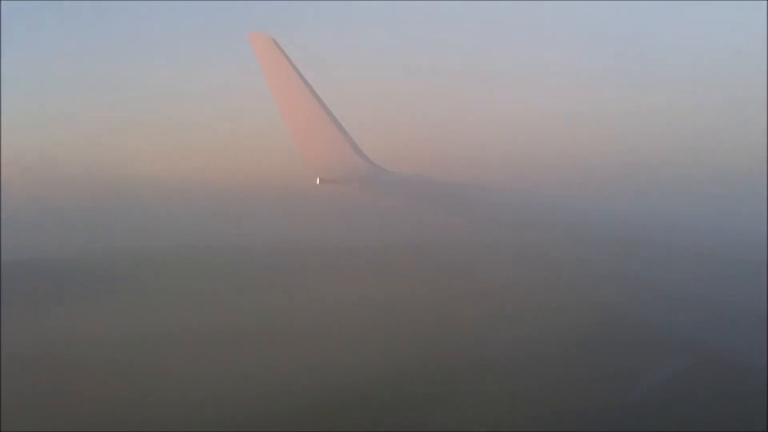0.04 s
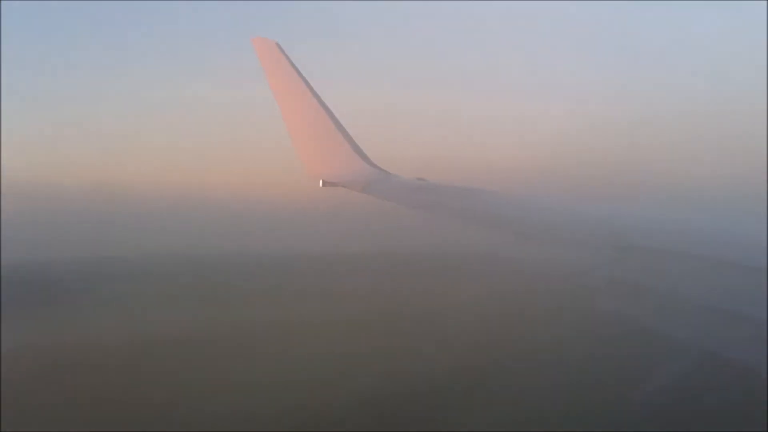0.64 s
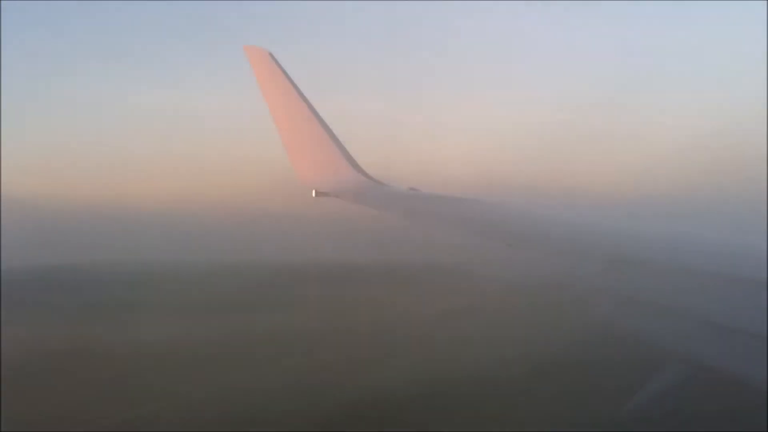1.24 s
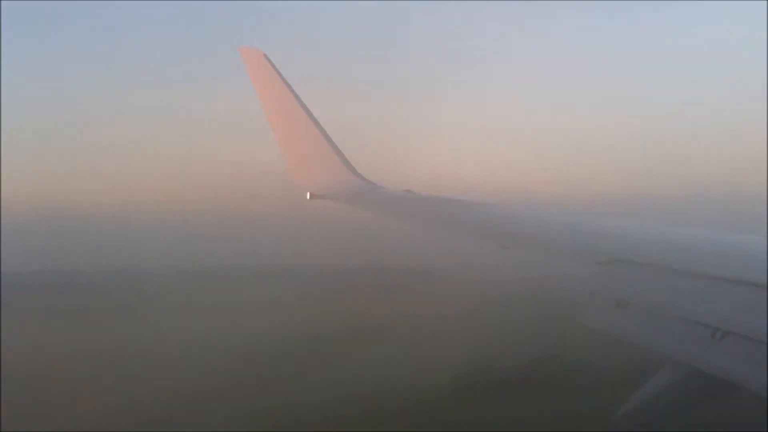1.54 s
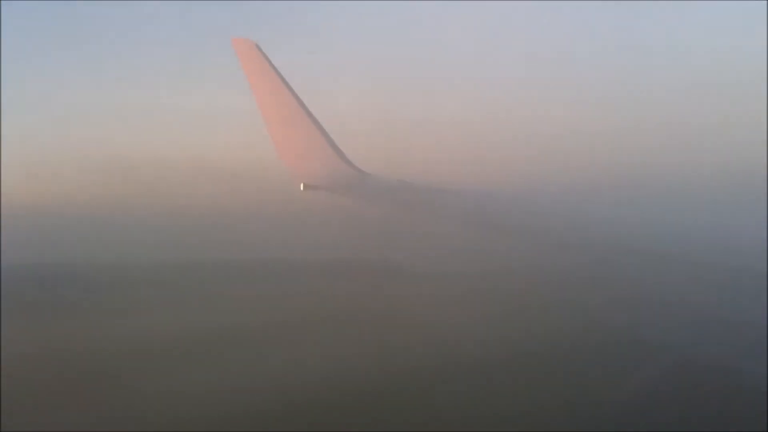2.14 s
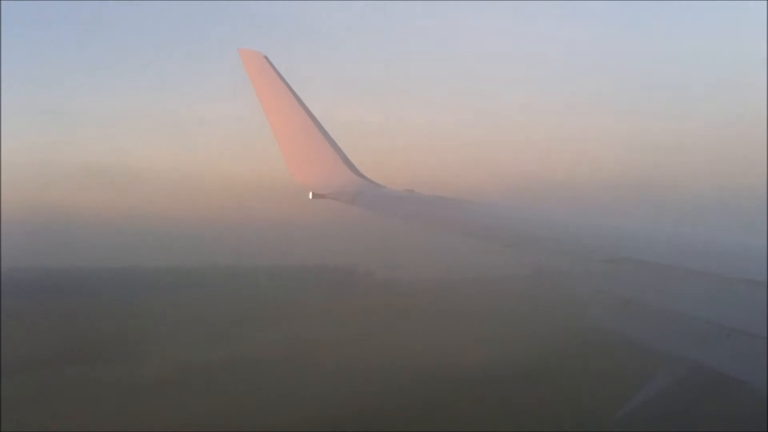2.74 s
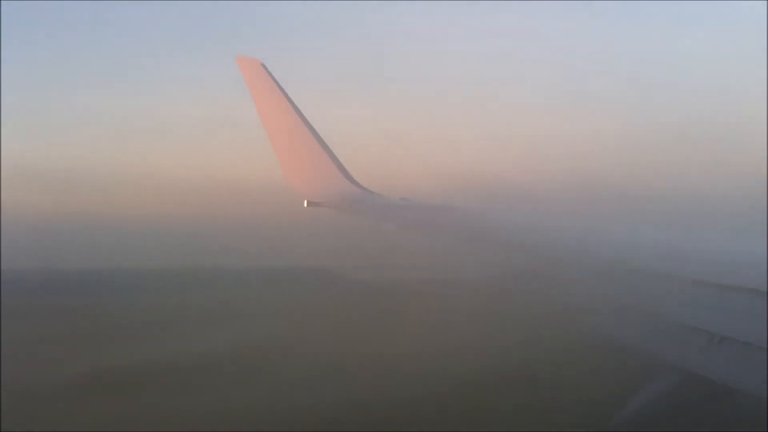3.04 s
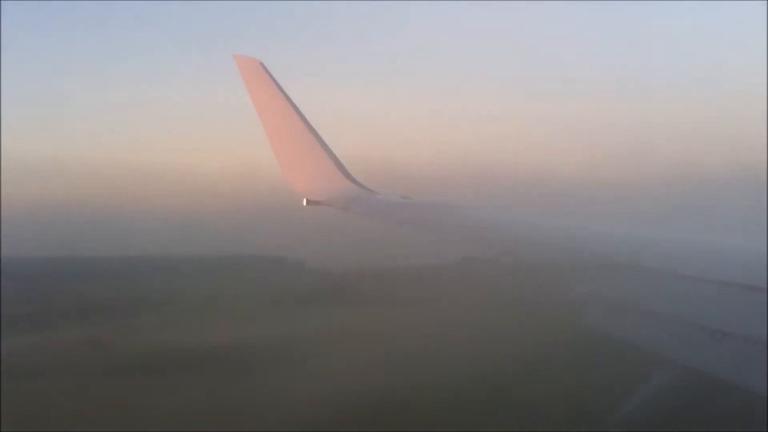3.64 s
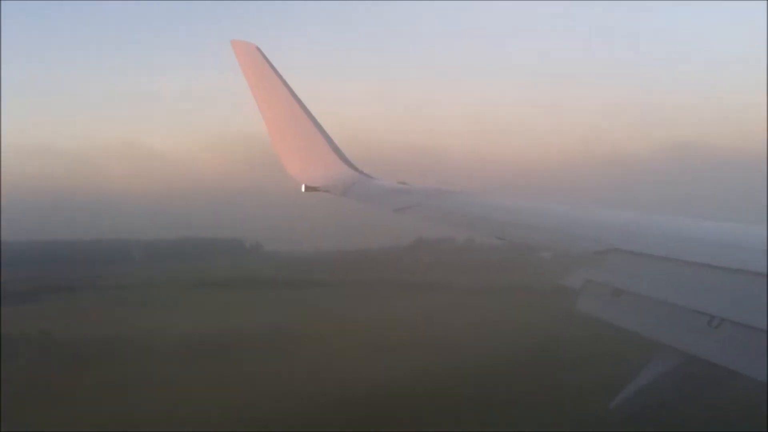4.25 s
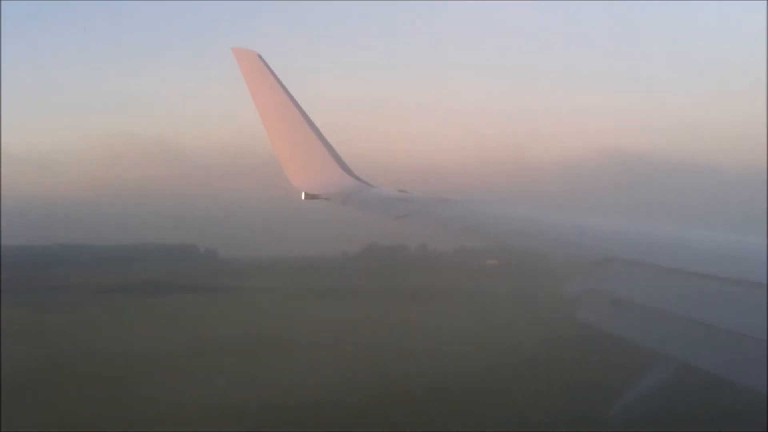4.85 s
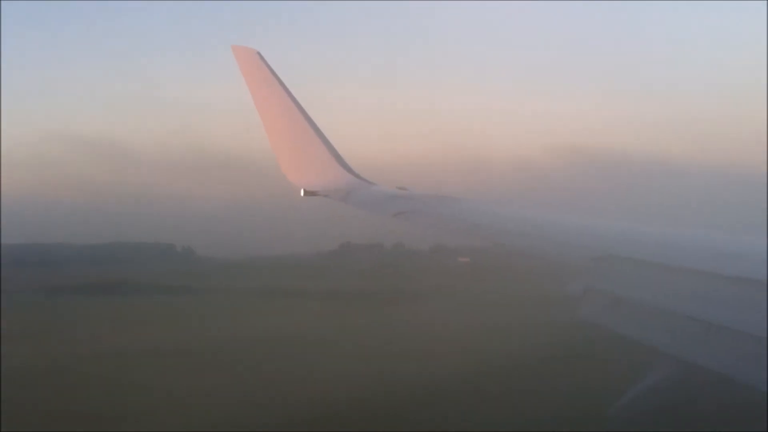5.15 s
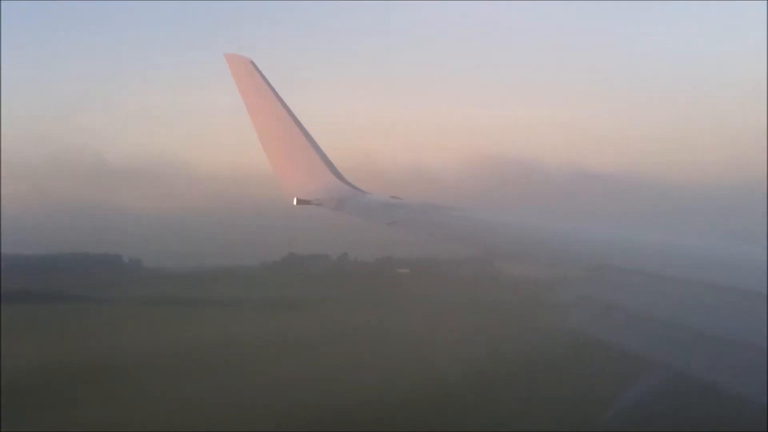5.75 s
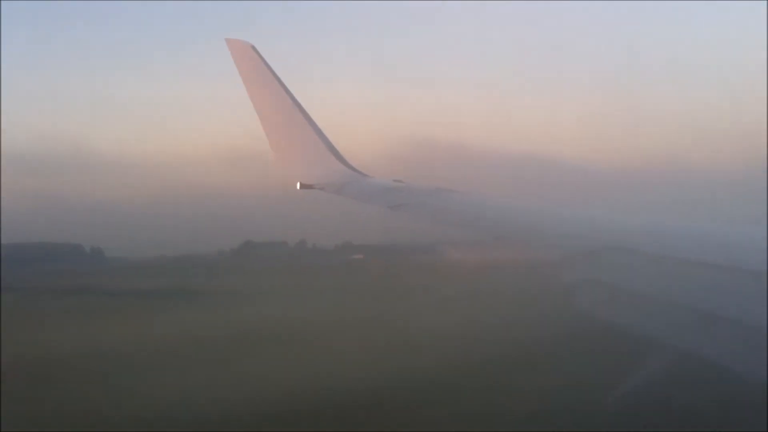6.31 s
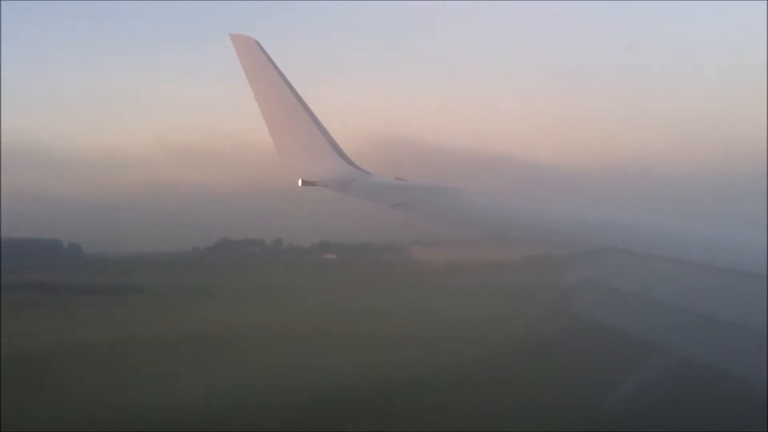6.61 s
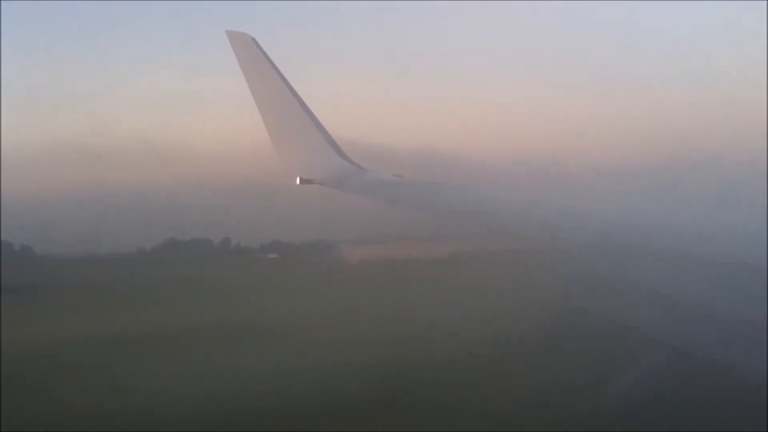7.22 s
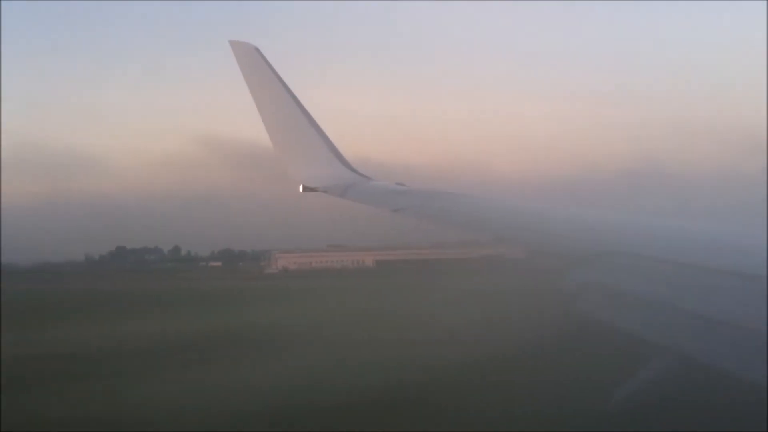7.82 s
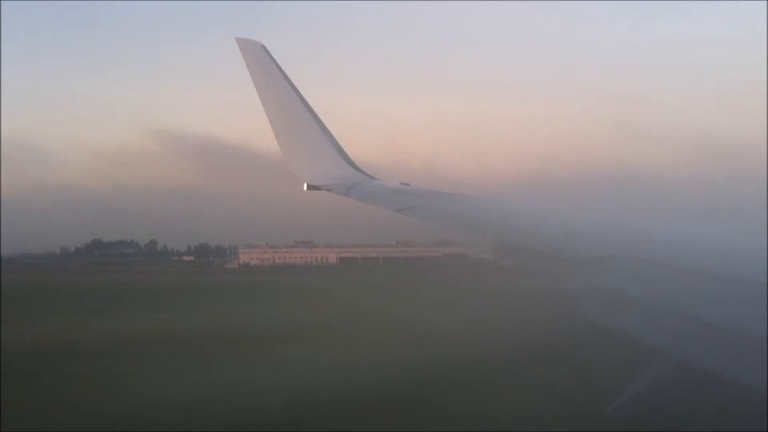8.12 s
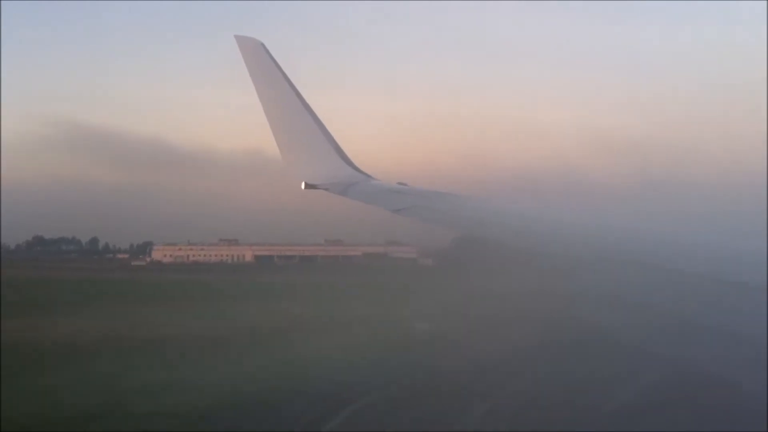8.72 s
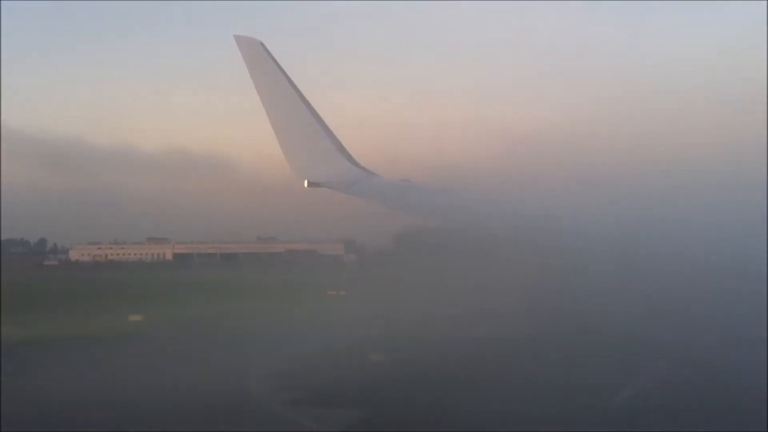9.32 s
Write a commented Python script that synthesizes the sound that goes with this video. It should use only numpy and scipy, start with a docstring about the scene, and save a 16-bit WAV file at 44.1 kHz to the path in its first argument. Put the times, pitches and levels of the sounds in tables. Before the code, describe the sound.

A low, steady roar of jet engines fills an aircraft cabin, heard from a seat by the window. It wavers slightly and slowly grows a little quieter, with a faint airflow hiss above it the whole time. A few soft, dull knocks from a wall panel come through the rumble, two close together and then one more later.

```python
"""A window seat inside an airliner flying low over an airfield.
Engine exhaust and turbulent airflow force the fuselage into vibration. The lined walls transmit mainly
low frequencies, and cabin resonances colour them into a deep roar that heaves and slowly eases.
A wall panel shifts and rings in a few soft knocks. The slipstream adds a faint rush, and on top
lies a thin hiss; the treble of both dips briefly at irregular moments."""
import sys
import numpy as np
from scipy import signal
from scipy.fft import rfft, irfft
from scipy.io import wavfile
from scipy.ndimage import uniform_filter1d

SR = 44100
rng = np.random.default_rng(int(sys.argv[2]) if len(sys.argv) > 2 else 0)


def output_pcm(signal):
    """Save a mono or channel-first signal as 16-bit PCM at the path in sys.argv[1].

    Samples are clipped to [-1, 1] before scaling.
    """
    pcm = np.clip(np.atleast_2d(signal).T, -1, 1) * 32767
    wavfile.write(sys.argv[1], SR, np.round(pcm).astype(np.int16))


N = 417627

# Turbulence heard through the walls. Each row: frequency in Hz, relative spectral level in dB.
ROAR_SPECTRUM = [(12, -49), (32, -43), (45, -21), (65, -15.5), (95, -7), (127, -7), (155, -2.5), (215, -5),
                 (270, -12), (335, -13.5), (400, -23.5), (520, -37.5), (900, -58), (2000, -87)]
# Resonances of the cabin air and walls. Each row: centre in Hz, width in Hz, lift in dB.
CABIN_RESONANCES = [(108.3, 15.5, 8), (177.8, 20.4, 3.5), (218, 4.8, 1.5), (239.6, 8, 3), (303.5, 37, 5),
                    (331.6, 14.4, 4)]
# The roar's slow heaving and easing. Each row: time in seconds, relative level in dB.
ROAR_ENVELOPE = [(0, -40.5), (.95, -42.5), (1.35, -41), (2.1, -42.6), (3.6, -41.5), (4.2, -43.5),
                 (4.65, -42), (5.05, -43.5), (7.3, -44), (8, -43), (8.5, -44.5), (9.47, -44)]
# Knocks of the wall panel. Each row: start in seconds, peak level in dB before the treble is removed.
PANEL_KNOCKS = [(1.851, -48), (2.3302, -41), (5.4604, -36.5)]
# Modes of the panel. Each row: frequency in Hz, relative level in dB, time to decay 60 dB in seconds.
PANEL_MODES = [(166, 5, 0.061), (322, 5, .025), (680, -17, .008), (890, -11, 0.012), (1380, -4, .008)]
# Air rushing along the skin. Each row: frequency in Hz, relative spectral level in dB.
AIRFLOW_SPECTRUM = [(200, -6.5), (450, 2), (620, -1), (710, -4), (815, -1), (900, -6.5), (1150, -9),
                    (1800, -15), (4000, -30)]
# The thin hiss. Each row: frequency in Hz, relative spectral level in dB.
HISS_SPECTRUM = [(300, -5), (1000, -1.5), (2000, -1), (4000, -2), (8500, -5), (10500, -6.5), (12500, -6),
                 (15500, -4)]


def roar(level_db=-42.5, crossover_hz=260, buffet_db=1.0, drone_share=0.59):
    """Forced vibration: exhaust and turbulence drive the cabin, which responds most at its resonances."""
    hz = np.fft.rfftfreq(N, 1 / SR)
    lift_db = sum(db / (1 + (2 * (hz - centre) / width) ** 2) for centre, width, db in CABIN_RESONANCES)
    boom, drone = split_bands(shaped_noise(ROAR_SPECTRUM, lift_db), crossover_hz)
    times, envelope_db = np.transpose(ROAR_ENVELOPE)
    heave_db = np.interp(np.arange(N) / SR, times, envelope_db - envelope_db.mean())
    swing_db = heave_db + buffet_db * buffeting()
    boom = steadied(boom, seconds=0.3) * amplitude(swing_db)
    drone = steadied(drone, seconds=0.49) * amplitude(drone_share * swing_db)  # the upper band swings less
    return amplitude(level_db) * unit_rms(boom + drone)


def buffeting(slow_hz=3.7, fast_hz=19):
    """Random amplitude modulation: a slow, band-limited fluctuation of rms 1 for the roar's level."""
    hz = np.fft.rfftfreq(N, 1 / SR)
    band = hz / (hz + slow_hz) / (1 + (hz / fast_hz) ** 4)
    return unit_rms(irfft(rfft(rng.standard_normal(N)) * band, N))


def panel_knocks(cutoff_hz=1570):
    """Damped free vibration: the panel shifts in its seat, and each of its modes decays exponentially."""
    t = np.arange(SR // 4) / SR
    ring = sum(amplitude(db - 60 * t / t60) * np.cos(2 * np.pi * hz * t) for hz, db, t60 in PANEL_MODES)
    ring /= abs(ring).max()
    knocks = np.zeros(N)
    for start, db in PANEL_KNOCKS:
        span = knocks[round(start * SR):][:len(ring)]
        span += amplitude(db) * ring[:len(span)]
    return split_bands(knocks, cutoff_hz)[0]  # the padded contact passes no treble


def airflow(level_db=-70, swell_at_s=0.18, swell_half_width_s=0.021, swell_db=5.5):
    """Transmission loss: the wall lining muffles the slipstream's rush, which swells briefly once."""
    t = np.arange(N) / SR
    swell = 1 / (1 + ((t - swell_at_s) / swell_half_width_s) ** 2)
    return amplitude(level_db + swell_db * swell) * shaped_noise(AIRFLOW_SPECTRUM)


def hiss(level_db=-68):
    """Broadband noise: power spread over a wide band is heard as a smooth hiss far under the roar."""
    return amplitude(level_db) * shaped_noise(HISS_SPECTRUM)


def mottled(sound, depth_db):
    """Modulation in time and frequency: small random patches of gain make a noise slightly grainy."""
    spectrogram = signal.stft(sound, nperseg=1024, noverlap=768)[2]
    patches = uniform_filter1d(rng.standard_normal(spectrogram.shape), size=4, axis=0)
    patches = unit_rms(uniform_filter1d(patches, size=5, axis=1))
    grainy = signal.istft(spectrogram * amplitude(depth_db * patches), nperseg=1024, noverlap=768)[1]
    return sound.std() * unit_rms(grainy[:N])


def treble_dips(sound, above_hz=1600, dips_per_s=2.8, depth_db=14, spread_db=6.5, half_width_s=0.01):
    """Amplitude modulation of one band: the treble sinks in brief Gaussian dips as the rest carries on."""
    t, gain = np.arange(N) / SR, np.ones(N)
    for slot, (offset, strength) in enumerate(rng.random((64, 2))):
        centre_s = (slot + offset) / dips_per_s
        dip_db = depth_db + spread_db * (2 * strength - 1)
        near = slice(*np.searchsorted(t, [centre_s - 0.05, centre_s + 0.05]))
        bell = np.exp(-((t[near] - centre_s) / half_width_s) ** 2)
        gain[near] *= 1 - (1 - amplitude(-dip_db)) * bell
    low, high = split_bands(sound, above_hz, order=4)
    return low + gain * high


def shaped_noise(spectrum, lift_db=0):
    """Spectral shaping: white noise filtered to a curve on a log-frequency axis, with an rms of 1."""
    hz = np.fft.rfftfreq(N, 1 / SR)
    points_hz, points_db = np.transpose(spectrum)
    db = np.interp(np.log(hz + 1), np.log(points_hz + 1), points_db) + lift_db
    return unit_rms(irfft(rfft(rng.standard_normal(N)) * amplitude(db), N))


def split_bands(sound, hz, order=8):
    """Complementary filters: the parts below and above a frequency, which sum to the whole."""
    low = irfft(rfft(sound) / (1 + (np.fft.rfftfreq(N, 1 / SR) / hz) ** order), N)
    return low, sound - low


def steadied(sound, seconds):
    """Division by the running rms holds a noise's power even over spans longer than the given time."""
    power = uniform_filter1d(sound ** 2, int(seconds * SR))
    return sound * np.sqrt(np.mean(sound ** 2) / (abs(power) + 1e-20))


def amplitude(db):
    """The decibel scale: 20 dB is a factor of ten in amplitude."""
    return 10 ** (db / 20)


def unit_rms(x):
    """Normalisation to an rms of 1."""
    return x / np.sqrt(np.mean(x ** 2) + 1e-20)


def scene():
    """Superposition: roar, knocks, airflow and hiss add at the seat, in one channel."""
    rush = mottled(airflow(), depth_db=2.5) + mottled(hiss(), depth_db=1.27)
    return (roar() + panel_knocks() + treble_dips(rush))[None]


def record(dry):
    """Band limiting: a steep low-pass filter removes the highest treble."""
    lowpass = signal.firwin(611, cutoff=15800, window=("kaiser", 7), fs=SR)
    return signal.oaconvolve(dry, lowpass[None], "same")


dry = scene()
out = record(dry)
output_pcm(out)
```